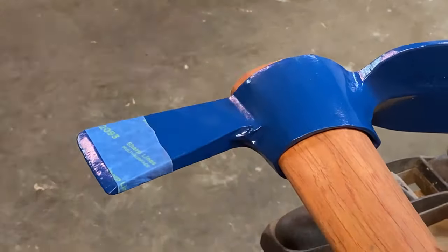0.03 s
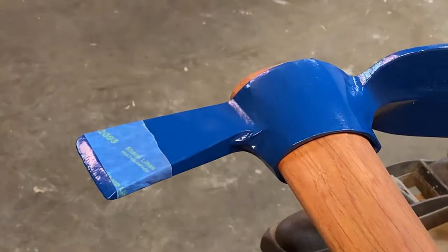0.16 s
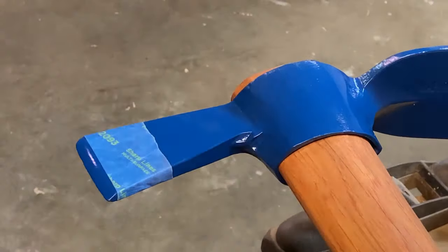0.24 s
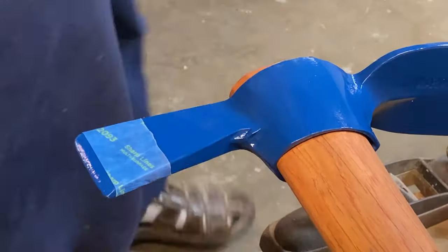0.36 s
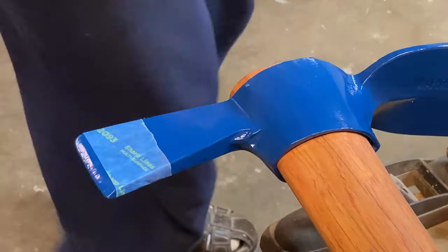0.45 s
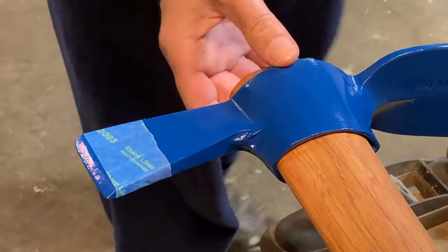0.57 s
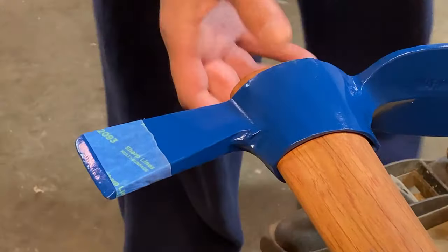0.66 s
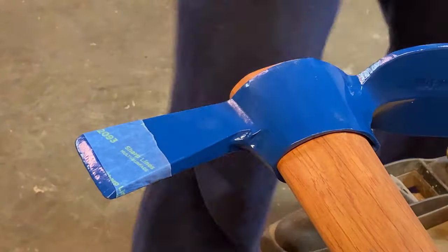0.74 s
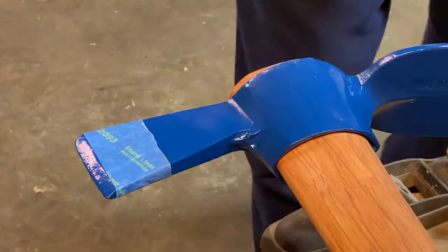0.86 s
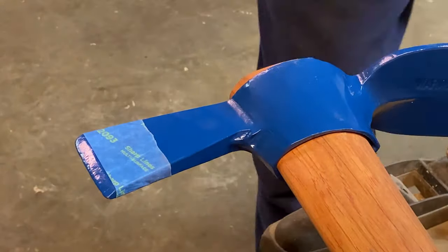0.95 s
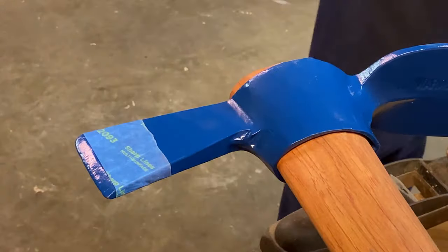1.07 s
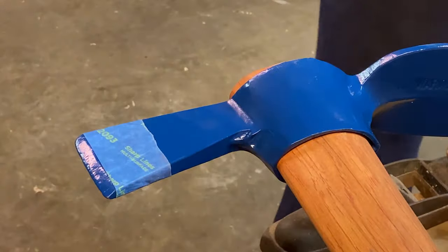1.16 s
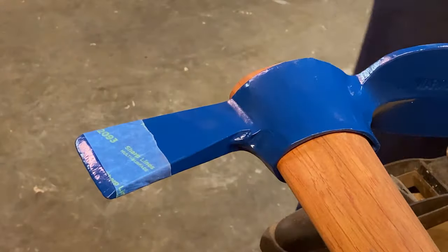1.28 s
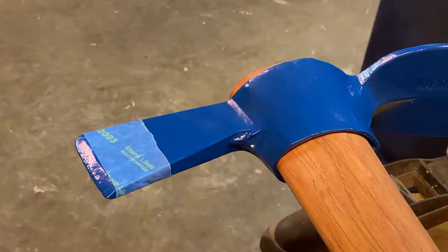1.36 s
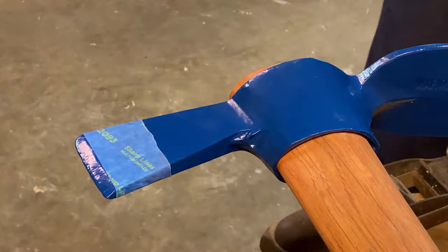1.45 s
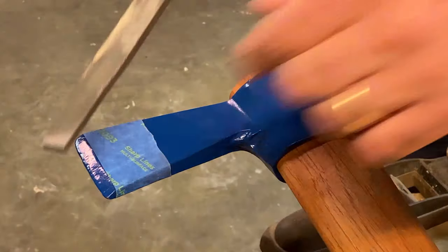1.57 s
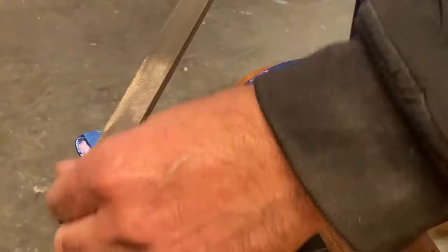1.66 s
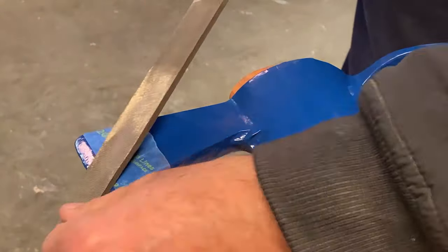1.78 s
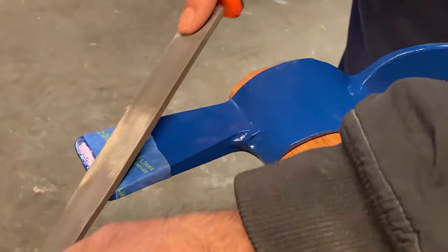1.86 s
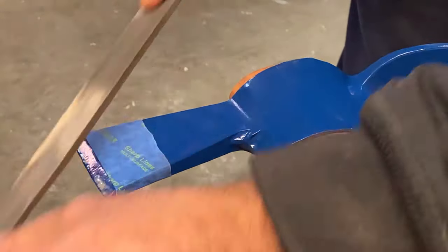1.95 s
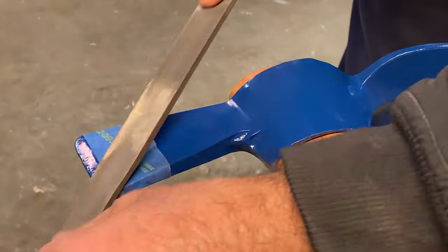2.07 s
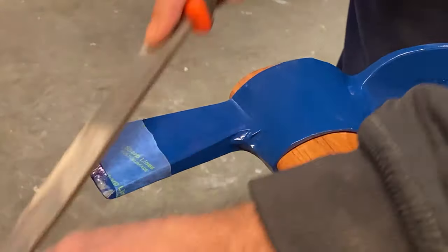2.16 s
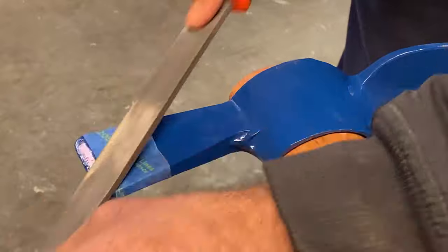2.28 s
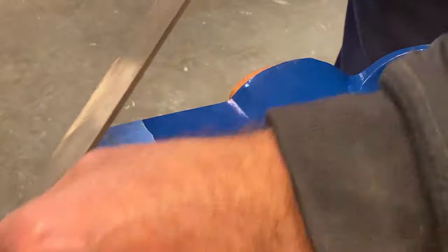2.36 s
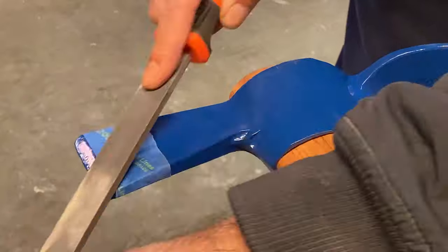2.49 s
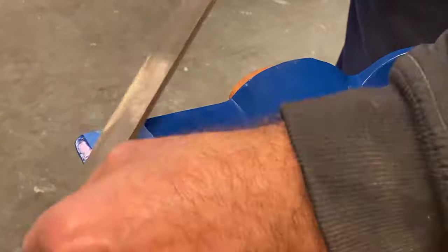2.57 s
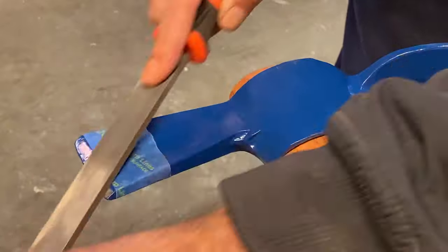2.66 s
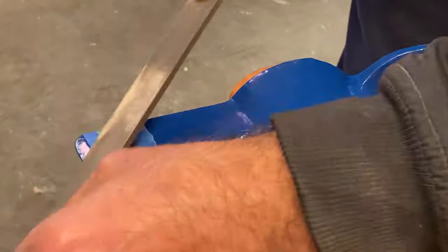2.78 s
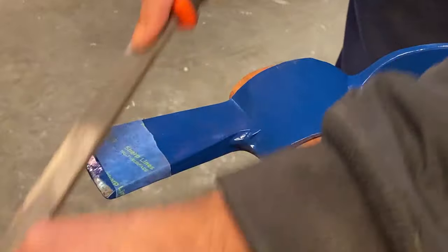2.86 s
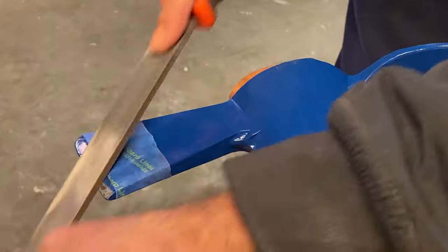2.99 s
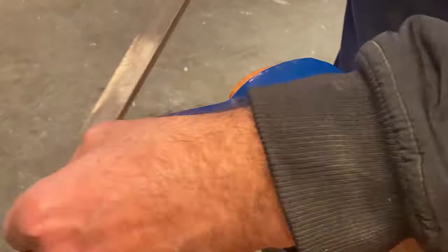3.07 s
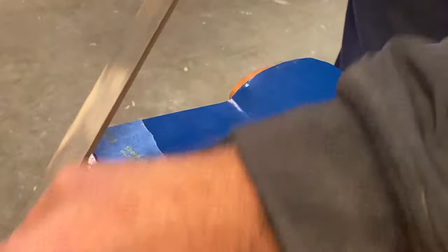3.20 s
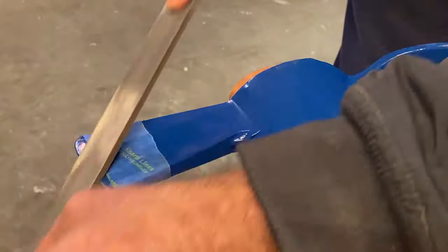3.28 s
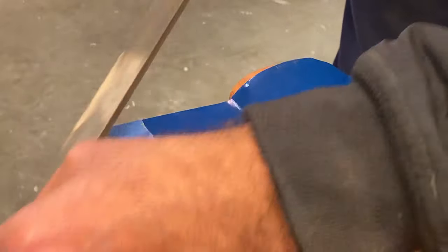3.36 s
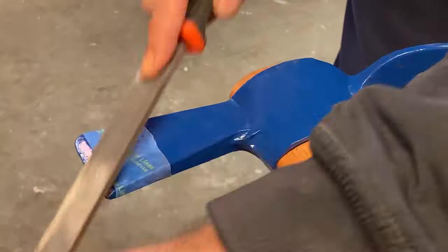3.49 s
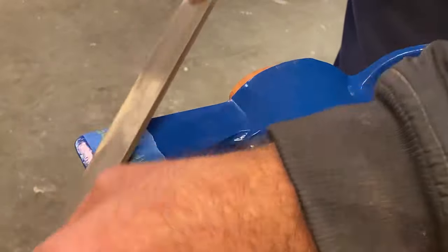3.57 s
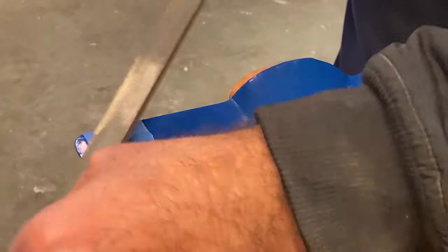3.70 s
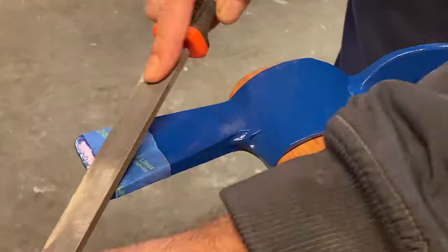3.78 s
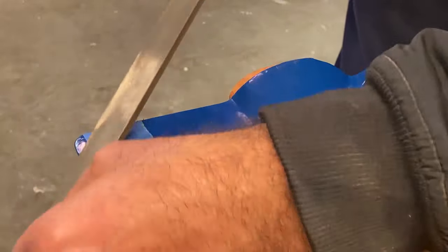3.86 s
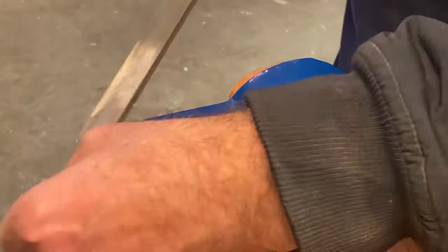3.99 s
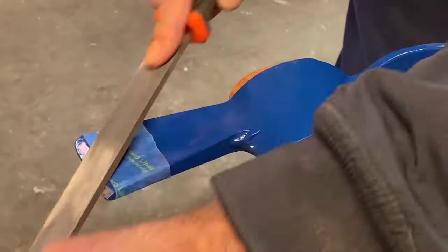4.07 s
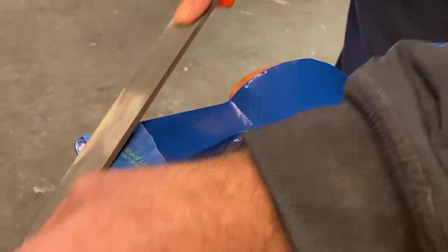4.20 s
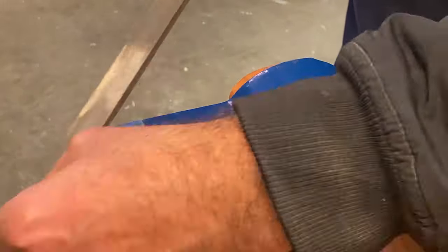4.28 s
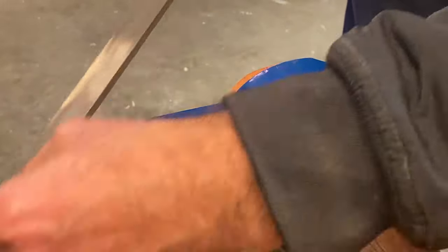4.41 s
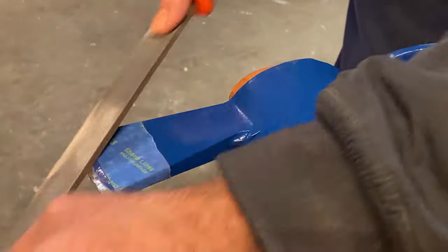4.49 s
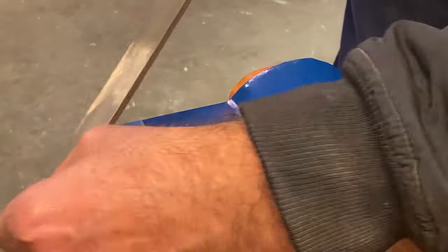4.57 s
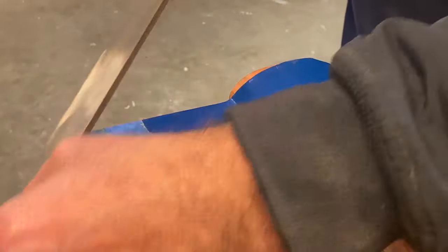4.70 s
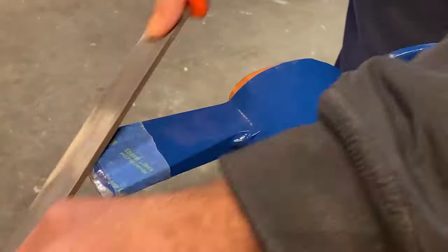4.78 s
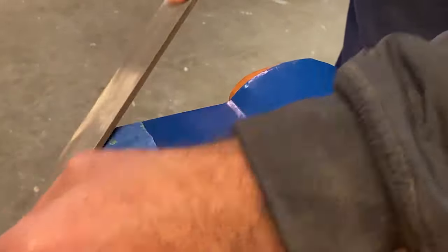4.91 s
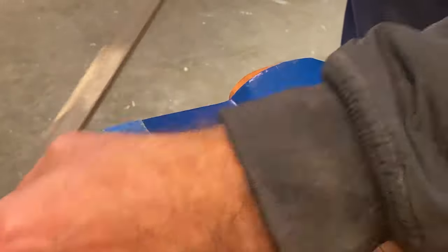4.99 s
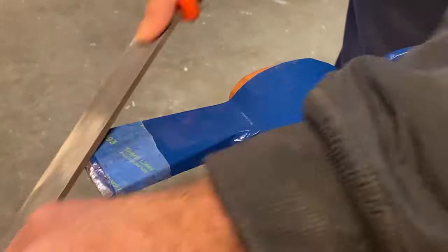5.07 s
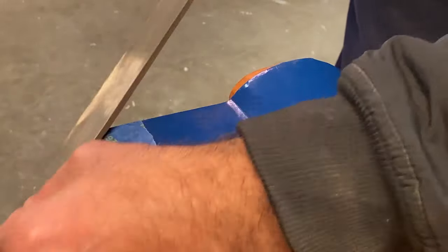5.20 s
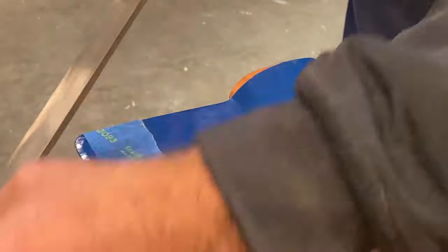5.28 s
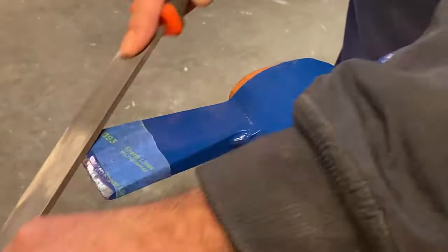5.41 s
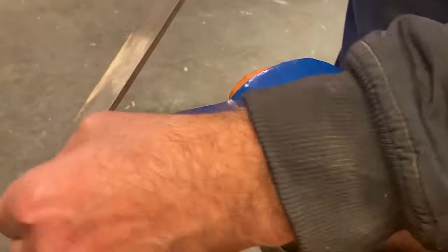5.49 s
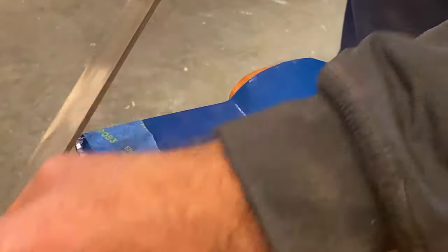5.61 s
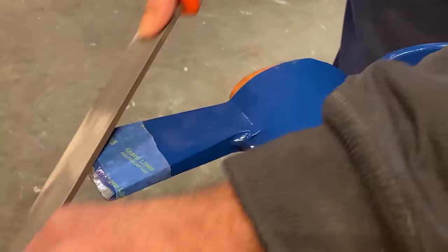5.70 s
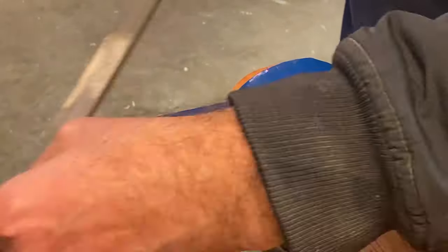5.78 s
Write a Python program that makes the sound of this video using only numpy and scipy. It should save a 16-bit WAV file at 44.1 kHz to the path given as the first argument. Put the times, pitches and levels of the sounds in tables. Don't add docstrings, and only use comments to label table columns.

```python
import sys
import numpy as np
from scipy import signal
from scipy.fft import rfft, irfft, next_fast_len
from scipy.io import wavfile
from scipy.ndimage import map_coordinates

SR = 44100
rng = np.random.default_rng(int(sys.argv[2]) if len(sys.argv) > 2 else 0)


def ratio_of_db(decibels):
    return 10 ** (np.asarray(decibels, float) / 20)


def transcribe(signal):
    frames = np.atleast_2d(signal).T
    limited = np.clip(frames, -1, 1)
    pcm = np.round(limited * 32767).astype(np.int16)
    wavfile.write(sys.argv[1], SR, pcm)


N = 257984


def evened(x):
    return x / np.sqrt(np.mean(x ** 2) + 1e-20)


def read(points, hz):
    f, value = np.transpose(points)
    return np.interp(np.log(hz + 1), np.log(f + 1), value)


def add(mix, s, sound):
    part = mix[round(s * SR):][:len(sound)]
    part += sound[:len(part)]


def shaped(x, gain):
    size = next_fast_len(N)
    return irfft(rfft(x, size) * gain(np.fft.rfftfreq(size, 1 / SR)), size)[..., :N]


def ring(x, hz, width):
    pole = np.exp((2j * np.pi * hz - np.pi * width) / SR)
    return 2 * signal.lfilter([1 - abs(pole)], [1, -pole], x).real


def drift(per_s):
    knots = rng.standard_normal(2000)
    return np.interp(np.arange(N) / SR * per_s, np.arange(len(knots)), knots)


def grit(per_s, spread_db, smooth):
    size = ratio_of_db(spread_db * np.minimum(rng.exponential(1, N), 3))
    size = size * rng.choice([-1., 1.], N)
    clicks = evened(size * (rng.random(N) < per_s / SR))
    return evened(clicks + smooth * rng.standard_normal(N))


PART_HZ = [700, 3000, 6800, 9000]
# (frequency [Hz], level [dB per Hz])
RASP = [(410, -48), (700, -25), (865, -19), (1060, -16.5), (2920, -8.5), (4280, -1.5), (6120, -13),
        (7560, 15), (14800, -14), (16300, -7)]
# (frequency [Hz], width [Hz], level [dB])
BLADE_MODES = [(865, 90, -8), (1280, 70, -3), (1399, 60, -8), (2046, 60, -12), (2660, 71, -10.5),
               (3160, 43, -34.5), (3554, 30, -15), (3887, 110, -6.5), (4190, 58, -5.5), (5105, 200, -8.5),
               (5540, 60, -10.5), (5690, 150, -6.5)]
# (frequency [Hz], width [Hz], level [dB])
FILE_MODES = [(6120, 80, -13), (6320, 81, -7.5), (7484, 210, -3.5), (7680, 330, -5.5), (7960, 100, -25),
              (8335, 180, -6.5), (9300, 103, -6.5), (9840, 180, -30), (11780, 500, -16), (11450, 92, -21),
              (12750, 840, -15.5), (13350, 78, -9.5), (14700, 1200, -15.5)]


def rasping():
    pressure, clumps = pressures(), ratio_of_db(1.9 * drift(110))
    edges, out = [0, *PART_HZ, SR], head(pressure[0])
    wide_shares = [0, 0.56, 0.9, 0.65, 0.29]
    for k, share in enumerate(wide_shares):
        teeth = grit(per_s=3400, spread_db=1.5, smooth=0.49) * clumps * ratio_of_db(0.88 * drift(60))
        wide = shaped(teeth, lambda hz: ratio_of_db(read(RASP, hz)) * (hz > edges[k]) * (hz < edges[k + 1]))
        out += share * evened(wide) * pressure[k]
        modes = [m for m in BLADE_MODES + FILE_MODES if edges[k] < m[0] < edges[k + 1]]
        wanders = [4 * drift(35) for m in modes]
        signs = (-1.) ** np.arange(len(modes))

        def rung(x):
            total = 0
            for (hz, width, db), wander, sign in zip(modes, wanders, signs):
                total = total + sign * ratio_of_db(db) * ring(x * ratio_of_db(wander[:len(x)]), hz, width)
            return total

        if modes:
            ringing = rung(teeth * pressure[k]) / rung(teeth[:SR]).std()
            out += np.sqrt(1 - min(share, 1) ** 2) * ringing
    return out


# (push begins [s], length [s], bite [dB], edge squeal [dB], weight on the head [dB])
STROKES = [(2.172, 0.061, -43, -74, -27), (2.379, 0.035, -43.5, -59, 0), (2.532, .057, -38.5, -72, -16),
           (2.699, 0.061, -41.5, -62, -8.5), (2.87, 0.072, -42.5, -35.5, 1),
           (3.066, 0.039, -40, -37.5, -0.5), (3.205, 0.055, -40, -34, -0.5),
           (3.346, 0.07, -36, -28.5, -5.5), (3.509, 0.067, -39, -41.5, 0), (3.659, 0.064, -38, -45, -9.5),
           (3.83, 0.05, -41, -51, -1.5), (3.961, 0.069, -39.5, -37, -5), (4.134, 0.046, -40, -31.5, -0.5),
           (4.289, .043, -44.5, -38.5, 5), (4.407, 0.056, -41.5, -34.5, 0), (4.574, 0.039, -41.5, -33.5, 5),
           (4.71, 0.045, -42, -33.5, 5.5), (4.857, 0.046, -41.5, -31.5, 2),
           (4.992, 0.048, -38.5, -27, -3.5), (5.138, 0.049, -42, -30.5, 2.5),
           (5.306, 0.044, -42.5, -33, 2.5), (5.455, 0.046, -44.5, -37, 4), (5.617, 0.048, -41.5, -25.5, 3),
           (5.755, 0.06, -41.5, -28.5, 6)]


def pressures():
    t, level = np.arange(N) / SR, np.full((5, N), -120.)
    for (down, *_), (s, length, bite, squeal, weight) in zip(LANDINGS[-len(STROKES):], STROKES):
        now, end = t > down, s + length
        knots = [s, s + 0.31 * length, s + 0.78 * length, end, end + 0.019, end + 0.079]
        drag = -49 + 0.92 * min(squeal + 54, 0)
        db = np.interp(t[now], knots, [drag, bite - 3, bite + 1, bite - 1.5, bite - 27.5, bite - 41])
        push = np.interp(t[now], knots, [0.35, 1.13, 1.07, 0.74, 2.06, 0.32])
        slack = 1 - push
        squeal_s, squeal_width_s = end - 0.014, 0.012
        burst = ratio_of_db(squeal) * np.exp(-0.5 * ((t[now] - squeal_s) / squeal_width_s) ** 2)
        shrill = 20 * np.log10(ratio_of_db(db - 1.5) + burst)
        blade = db - 2.13 + 0.28 * weight - 3.9 * slack
        tip = db + 5.5 - 0.025 * weight - 0.7 * slack
        level[:, now] = [db + weight - 16 * slack, blade, db, shrill, tip]
    return ratio_of_db(level)


# (frequency [Hz], width [Hz], level [dB])
HEAD_MODES = [(451, 26, -9), (536, 28, 0)]


def head(pressure):
    t = np.arange(N) / SR
    vice = ring(ring(rng.standard_normal(N), 383, 340), 383, 340)
    out = 0.3 * pressure * evened(vice)
    for hz, width, db in HEAD_MODES:
        chatter = np.cos(2 * np.pi * hz * t + 1.4 * drift(50)) * ratio_of_db(db + 3.5 * drift(30))
        out += ring(ring(1.6 * chatter * pressure, hz, 1.3 * width), hz, 150)
    return out


# (time [s], strength [dB], edge squeal against it [dB], tip sparkle against it [dB])
LANDINGS = [(1.8003, -30.5, -4.5, 6), (1.946, -44.5, -21, 3), (2.1261, -45.5, -25, -12),
            (2.3302, -25.5, -13, 8), (2.4991, -27, -1, 7), (2.6795, -29.5, -0.5, 6.5),
            (2.862, -30.5, -5, 14), (3.0247, -29, 3, 5.5), (3.1827, -43, 15.5, 14), (3.3414, -38, 3, 1),
            (3.4938, -24.5, 6.5, 11), (3.6503, -28, 1, 11.5), (3.8055, -29, 4, 14), (3.9532, -32, 6, 17),
            (4.102, -35.5, 8, 6.5), (4.2453, -32.5, 14, -1), (4.3956, -30, 9.5, 7), (4.5426, -30, 11.5, 5),
            (4.6763, -29, 4.5, 4.5), (4.8277, -29, 9, 11), (4.973, -29.5, 9, 11), (5.115, -26, 8, 8.5),
            (5.2743, -23, 6.5, 9), (5.4277, -25.5, 7, 11), (5.5872, -32.5, 17, 11.5),
            (5.7392, -28.5, 5.5, 8.5)]


def landings():
    out, t = np.zeros(N), np.arange(2000)[:, None] / SR
    loose = [(f, 0.063 * f, -17) for f in np.geomspace(750, 16500, num=30)]
    hz, width, db = np.transpose(HEAD_MODES + BLADE_MODES + FILE_MODES + loose)
    part = np.searchsorted(PART_HZ, hz)
    slap_db = 8 * np.exp(-((hz - 4600) / 900) ** 2) + 5 * np.exp(-((hz - 870) / 100) ** 2)
    crack = np.exp(-np.pi * (width + 0.035 * hz) * t)
    long_ring = np.exp(-np.pi * (0.22 * width + 0.007 * hz) * t)
    fade = crack + 0.33 * long_ring
    rise = 1 - np.exp(-t * np.minimum(600 * (hz / 1000) ** 2, 5000))
    luck = rng.standard_normal((len(LANDINGS), 3, len(hz)))
    for (s, strength_db, squeal_db, sparkle_db), (colour, turn, bend) in zip(LANDINGS, luck):
        tones = np.sin(2 * np.pi * hz * (1 + 0.0044 * bend) * t + 1.67 * turn)
        waves = ratio_of_db(0.57 * db + slap_db + 2.35 * colour) * fade * rise * tones
        parts = waves @ (part[:, None] == np.arange(5))
        thud_db, blade_db = -54.5, -43 + 0.5 * (strength_db + 29.5)
        level_db = np.array([thud_db, blade_db, strength_db, strength_db + squeal_db, strength_db + sparkle_db])
        level_db = level_db + [5.2, 5.3, 9.14, 7.0, 6.1]
        clap = parts / abs(parts).max(0) @ ratio_of_db(level_db)
        add(out, s - 0.0003, clap)
        add(out, s - 0.0018, 0.0059 * clap)
        add(out, s + 0.0015, 0.27 * clap)
    return out


# (frequency [Hz], phase [rad])
LEAD = [(500, 0.7), (1200, -0.28), (2000, 0.3), (2760, -1.3), (3100, -0.44), (3790, -1.5), (4910, -0.9),
        (6200, 0), (6980, 1.1), (9730, -2), (11900, 4), (12500, 0), (13500, 3.5), (16600, 5.5)]
# (frequency [Hz], level [dB])
LEAN = [(60, 2), (180, -3), (550, -1), (1650, -1), (4970, 0.5), (15000, 5.5)]


def ports(x):
    apart = lambda hz: np.minimum(hz / 1100, 1) ** 2
    lean = lambda hz: ratio_of_db(-read(LEAN, hz) * apart(hz))
    lag = lambda hz: np.exp(-1j * read(LEAD, hz) * apart(hz))
    right = shaped(x, lambda hz: lean(hz) * lag(hz))
    path = np.arange(N) + 0.5 * drift(6.4)
    right = map_coordinates(right, [path], order=3) * ratio_of_db(1.4 * drift(18))
    upper, quarter = shaped(right, apart), shaped(right, lambda hz: 1j * apart(hz))
    sway = 1.19 * drift(12)
    right = right + upper * (np.cos(sway) - 1) + quarter * np.sin(sway)
    return np.array([x, right]) * ratio_of_db(-0.58)


# (time
# [s], peak [dB], pitch [Hz], treble [dB])
KNOCKS = [(0.108, -49, 1320, -68), (0.302, -53, 956, -64), (0.323, -48, 1020, -75), (0.365, -48, 1600, -71),
          (0.46, -48, 821, -72), (0.485, -38, 1420, -66), (0.503, -53, 487, -40.5), (0.578, -40, 480, -63),
          (0.589, -40.5, 527, -71), (0.794, -33, 1128, -49), (0.886, -42, 1400, -63),
          (1.044, -48, 780, -73), (1.107, -60, 523, -42), (1.127, -47.5, 524, -67), (1.168, -72, 552, -53),
          (1.204, -74, 513, -45.5), (1.297, -51, 1200, -51), (1.326, -42, 820, -68), (1.402, -39, 845, -44),
          (1.413, -27.5, 820, -53), (1.414, -33.5, 485, -70), (1.432, -55, 435, -52),
          (1.518, -43.5, 523, -61), (1.701, -57, 490, -50), (1.946, -26.5, 863, -64),
          (1.813, -41, 534, -70), (1.993, -34, 1450, -56), (2.009, -35, 1300, -54), (2.024, -60, 1280, -71)]


def knocks():
    out, t, t60 = np.zeros(N), np.arange(5000) / SR, 0.069
    width = 1.85 / t60 * 1.86
    uppers = 2450 * np.exp(0.18 * rng.standard_normal(len(KNOCKS)))
    for (s, db, low_hz, treble_db), high_hz in zip(KNOCKS, uppers):
        a, b = rng.standard_normal((2, len(t)))
        rattle = a * ratio_of_db(-60 * t / 0.029)
        body = ring(rattle, low_hz, width) + 0.53 * ring(rattle, high_hz, 2 * width)
        body += 0.2 * ring(rattle, 1120, 1600)
        body += 0.3 * ring(rattle, 423, 73)
        tick = ring(b * ratio_of_db(-60 * t / t60), 7200, 5300)
        knock = ratio_of_db(db) * body / abs(body).max()
        add(out, s, knock + ratio_of_db(treble_db - 4.5) * tick / abs(tick).max())
    return out


SLEEVES_S = 2.3
# (frequency [Hz], level [dB per Hz])
CLOTH = [(240, -33), (400, -1.5), (590, -13.5), (831, -11), (1270, -9), (3030, -9.5), (15000, -8.5),
         (16500, -41)]


def shuffling():
    (level, bright), t, pair = movements(), np.arange(N) / SR, []
    for side in range(2):
        rub = shaped(grit(per_s=3000, spread_db=3.0, smooth=6.5), lambda hz: ratio_of_db(read(CLOTH, hz)))
        low = shaped(rub, lambda hz: 1 / (1 + (hz / 3000) ** 6))
        high = shaped(rub, lambda hz: 1 / (1 + (9000 / (hz + 1)) ** 8))
        dull = evened(low) * ratio_of_db(-2.5 - 1.07 * bright)
        crisp = evened(high) * ratio_of_db(-7 + 0.75 * bright)
        pair.append(evened(rub - low - high) + dull + crisp)
    return diffuse(*pair) * level * ratio_of_db(3.57 * drift(60) + 2.2 * drift(19) * (t > SLEEVES_S))


# (time of its top [s],
# level [dB], swell [s], fade [s], brightness [dB])
SHUFFLE = [(0.013, -53, 0.11, 0.11, 4.5), (.07, -52.5, 0.16, 0.057, 1), (.14, -60.5, 0.078, 0.17, -1),
           (.4, -66, 0.15, 0.57, -1), (.25, -66, 0.19, 0.56, 0.5), (0.306, -55.5, 0.035, 0.14, -1.5),
           (0.501, -59, .02, 0.23, 9), (.63, -71.5, 0.53, 0.081, -8), (.798, -47, 0.029, .035, -3),
           (.86, -61, 0.13, 0.22, 4.5), (0.971, -60, 0.17, 0.069, 5.5), (1.04, -71, 0.0076, 0.22, -7),
           (1.12, -70, .1, 0.039, 10), (1.17, -72.5, .01, 0.25, 4), (1.304, -62.5, 0.042, 0.14, 3),
           (1.424, -53, .05, 0.032, -2), (1.52, -61, 0.015, 0.12, -6), (1.648, -59.5, 0.33, 0.15, 6),
           (1.82, -64.5, .03, 0.03, 18), (1.95, -53, .07, 0.18, 5), (2.005, -60, .15, 0.1, -8)]


def movements():
    s, db, swell, fade, bright = np.transpose(SHUFFLE)
    t = np.arange(0, N / SR, 0.001)
    late = t[:, None] - s
    fall_db = 26.5 * np.where(late < 0, -late / swell, late / fade)
    gains = ratio_of_db(db - fall_db) ** 2
    power = gains.sum(1) + ratio_of_db(np.where(t > SLEEVES_S, -79, -95)) ** 2
    return [np.interp(np.arange(N) / SR, t, v) for v in (np.sqrt(power), gains @ bright / power)]


# (frequency [Hz], level [dB per Hz])
HUM = [(18, -73), (30, -37), (54, -33), (80, -20.5), (176, 3.5), (261, 0.5), (388, 8.5), (593, -11.5),
       (2530, -19), (4410, -29), (4770, -18), (9480, -39), (15200, -43), (16500, -43)]


def hum():
    a, b = shaped(rng.standard_normal((2, N)), lambda hz: ratio_of_db(read(HUM, hz)))
    return ratio_of_db(-67.5 + 2.0 + 0.13 * drift(6.2)) * evened(diffuse(a, b))


# (frequency [Hz], likeness [-1 to 1])
SAME = [(60, 1), (180, 0.86), (550, 0.9), (1650, 0.64), (4970, 0.13), (15000, -0.2)]


def diffuse(a, b):
    same = lambda hz: np.clip(read(SAME, hz), -1, 1)
    return np.array([a, shaped(a, same) + shaped(b, lambda hz: np.sqrt(1 - same(hz) ** 2))])


# (frequency [Hz], time to fall 60 dB [s])
SHOP = [(300, 0.052), (1500, 0.22), (6000, 0.18), (15000, 0.026)]


def workshop(x, size_factor):
    taps = rng.choice([-1., 0, 0, 0, 0, 0, 0, 0, 0, 1.], (2, N))
    taps[:, :40] = 0
    hz, t, z = signal.stft(diffuse(*taps)[:, :SR // 2], SR, nperseg=64)
    decay = ratio_of_db(-60 * t / (size_factor * read(SHOP, hz)[:, None]))
    tail = signal.istft(z * decay, SR, nperseg=64)[1]
    return signal.fftconvolve(x[None], tail / np.linalg.norm(tail[0]), axes=1)[:, :N]


def scene():
    edge_hz = 15950
    claps, bumps = landings(), shaped(knocks(), lambda hz: hz > 180)
    tool = shaped(claps, lambda hz: 1 / (1 + (hz / 16300) ** 24)) + shaped(rasping(), lambda hz: hz < edge_hz)
    tool = shaped(tool, lambda hz: 1 / (1 + (130 / (hz + 1)) ** 4))
    room = workshop(ratio_of_db(-15.5) * tool + ratio_of_db(-10.5) * bumps, 0.65)
    room += workshop(ratio_of_db(-13) * tool, 0.1)
    soft = room + shuffling() + hum() + bumps * ratio_of_db([[0.4], [-0.4]])
    return ports(tool) + shaped(soft, lambda hz: hz < edge_hz)


def roll_off(x):
    return signal.sosfilt(signal.butter(12, 17080, fs=SR, output="sos"), x)


def record(dry):
    thin = signal.sosfilt(signal.butter(2, 70, "high", fs=SR, output="sos"), dry)
    return roll_off(thin)


dry = scene()
out = record(dry)
transcribe(out)
```